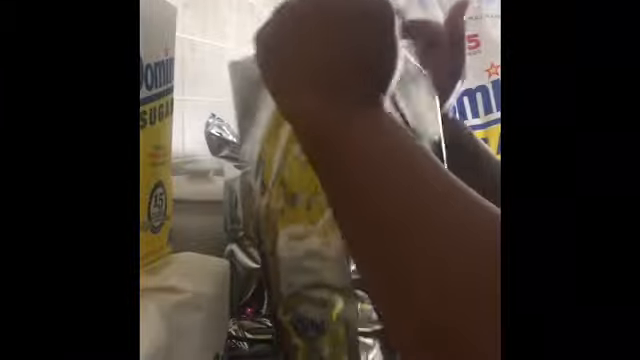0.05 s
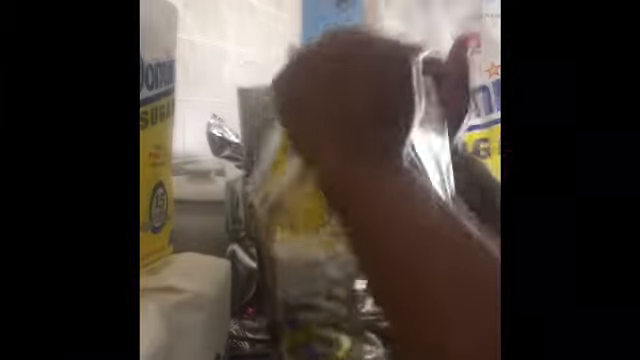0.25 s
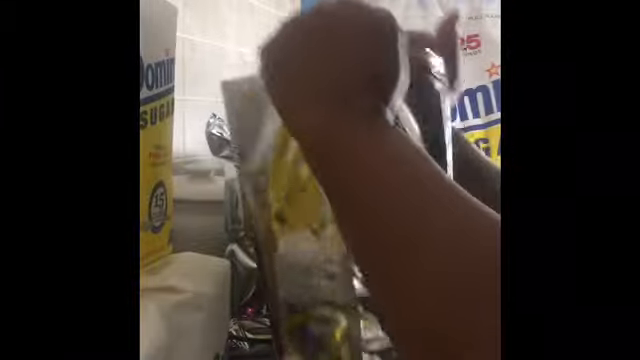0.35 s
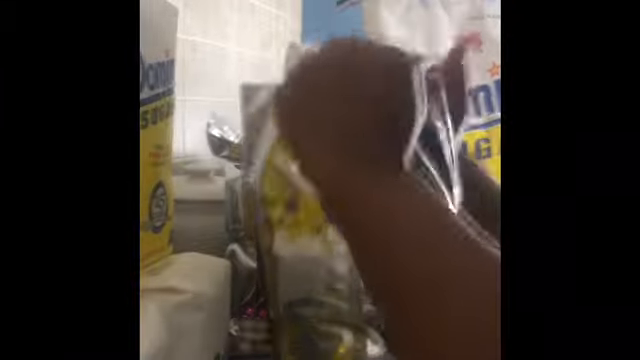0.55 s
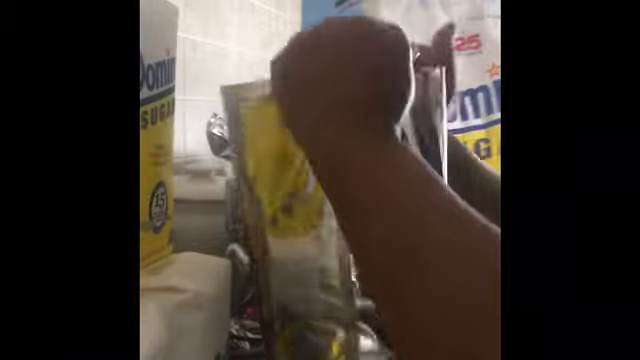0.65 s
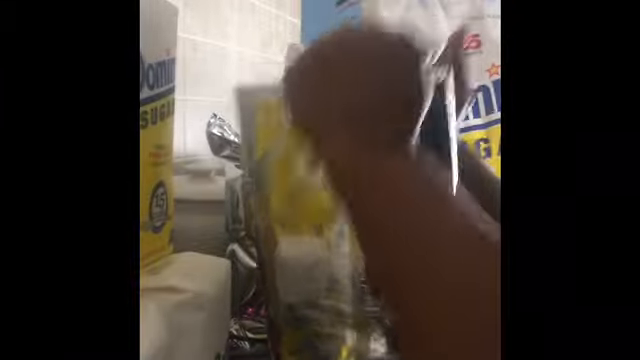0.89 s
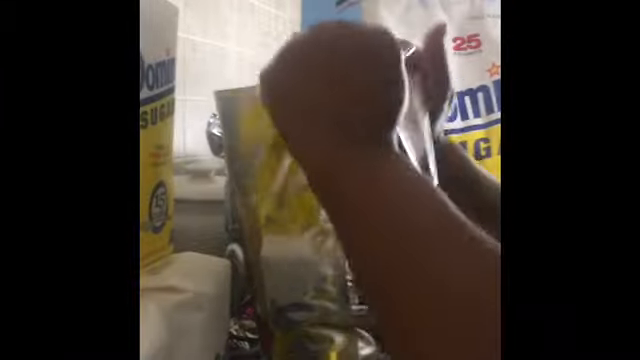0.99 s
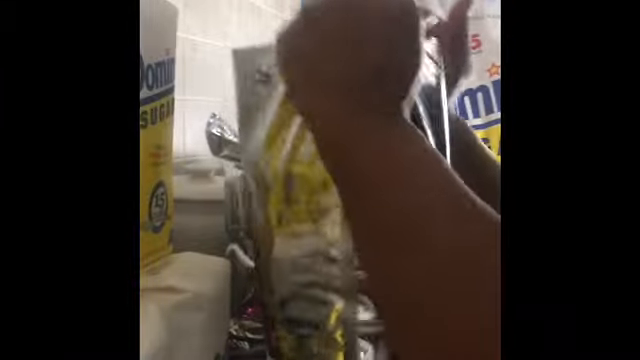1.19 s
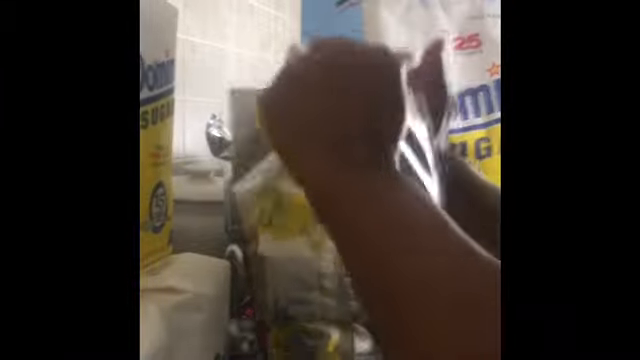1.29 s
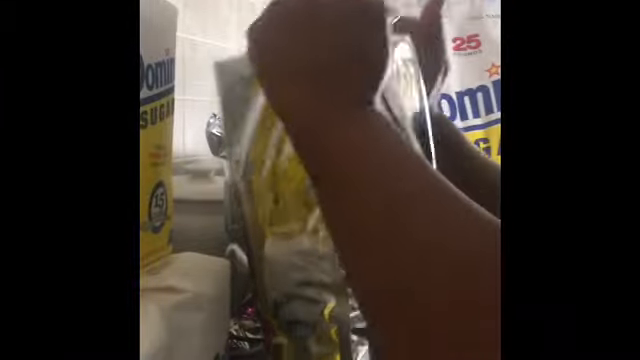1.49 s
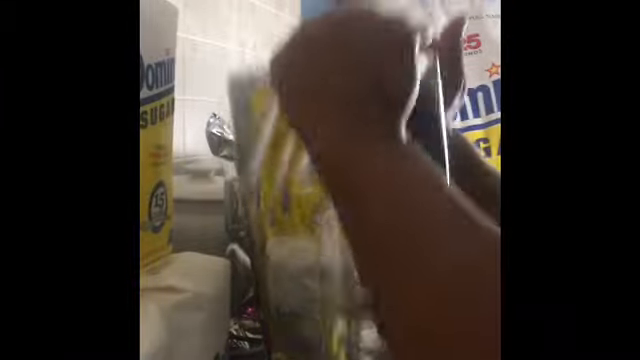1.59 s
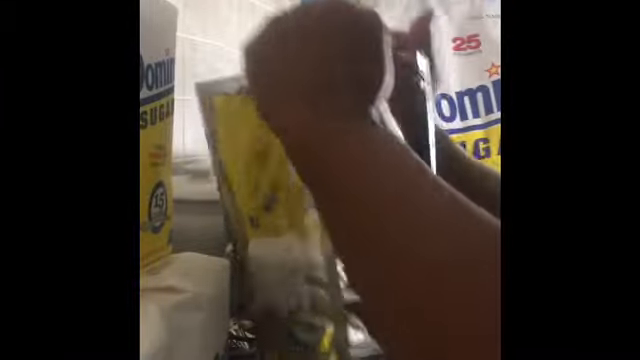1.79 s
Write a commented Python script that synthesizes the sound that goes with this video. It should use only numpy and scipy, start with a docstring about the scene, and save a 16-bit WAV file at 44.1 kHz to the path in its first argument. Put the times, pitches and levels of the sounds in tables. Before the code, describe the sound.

Bag of sugar knocked about on a counter, heard close on a small, bass-thin microphone: crackling foil and one heavy clattering knock, suddenly cut, then four regular lighter taps with dull slumping filling and faint ringing.

```python
"""Kitchen counter: a filled foil bag is knocked about on it. A loud close passage (shuffle, rap, heavy knock,
rattling) is cut off, then come four even, quieter taps. Force bumps ring the counter as dying sines; each tap
also makes a loose part tick twice (short modes with a near reflection), a vessel ring faintly (slow sines) and
the filling slump (noise bands). Foil is coloured noise bursts and grainy rustle; a steady noise floor lies below."""
import sys
import numpy as np
from scipy import signal
from scipy.fft import rfft, irfft
from scipy.io import wavfile

SR = 44100
rng = np.random.default_rng(int(sys.argv[2]) if len(sys.argv) > 2 else 0)


def transcribe(u):
    """Save the signal u as a 16-bit wav file named by the first command-line argument.

    u: samples, shape (n,) or (channels, n), limited to [-1, 1]; the rate is SR.
    q: integer samples, one column per channel.
    """
    v = np.clip(np.atleast_2d(u).T, -1, 1)
    q = np.round(v * 32767).astype(np.int16)
    wavfile.write(sys.argv[1], SR, q)


def attenuation_scalar(level_db):
    """Turn a level in dB into a linear amplitude multiplier (20 dB per decade)."""
    decades = np.asarray(level_db, float) / 20
    return 10 ** decades


N = 81585  # length in samples


def evened(x):
    """Scales a sound to an rms of 1."""
    return x / np.sqrt(np.mean(x ** 2) + 1e-20)


def add(mix, s, sound):
    """Lays a sound into the mix at s seconds, trimmed to fit."""
    part = mix[max(round(s * SR), 0):][:len(sound)]
    part += sound[:len(part)]


def seconds(length_s):
    """Time axis in seconds."""
    return np.arange(0, length_s, 1 / SR)


def coloured(x, points):
    """Shapes a sound by a spectrum of (freq_hz, level_db) points, joined on a log frequency axis."""
    point_hz, level_db = np.transpose(points)
    hz = np.fft.rfftfreq(len(x), 1 / SR)
    gain_db = np.interp(np.log(hz + 1), np.log(point_hz + 1), level_db)
    return irfft(rfft(x) * attenuation_scalar(gain_db), len(x))


def band(x, lo_hz, hi_hz):
    """Band-passes a sound and scales it to an rms of 1."""
    return evened(signal.sosfilt(signal.butter(2, [lo_hz, hi_hz], "band", fs=SR, output="sos"), x))


def rings(modes, length_s):
    """Sum of dying sines, one for each (pitch_hz, level_db, t60_s)."""
    t = seconds(length_s)
    return sum(attenuation_scalar(db - 60 * t / t60) * np.sin(2 * np.pi * hz * t) for hz, db, t60 in modes)


def pushes(rows):
    """Downward force bumps of unit area times level; a longer contact excites less treble."""
    force = np.zeros(N)
    for s, db, contact_ms in rows:
        bump = np.hanning(max(round(contact_ms * SR / 1000), 4))
        add(force, s, -attenuation_scalar(db) * bump / bump.sum())
    return force


def puff(colour, t60_s):
    """A dying burst of coloured noise, 30 ms long, peak 1."""
    t = seconds(.03)
    x = coloured(rng.standard_normal(len(t)), colour) * attenuation_scalar(-60 * t / t60_s)
    return x / abs(x).max()


# Taps of the bag: start_s, strength_db
TAPS = [(0.579, -28.5), (.9397, -28), (1.3062, -28), (1.6606, -29.5)]


def taps():
    """Each tap thuds the counter, slumps the filling, scuffs foil and leaves the vessel ringing."""
    out = thuds(TAPS)
    for k, (s, db) in enumerate(TAPS):
        add(out, s, vessel(k))
        add(out, s - .02, attenuation_scalar(db) * slump())
        add_scuffs(out, s, db)
    add_ticks(out)
    add_settling(out)
    return out


# Contacts of the bag bottom within a tap: offset_s, level_db (relative to the tap), contact_ms
BAG_CONTACTS = [(-.019, -17.5, 2.4), (-.0135, -13, 1.95), (-.0075, -9, 2.1), (-.0026, -1, 2.64),
                (.0078, -7.5, 3.3), (.018, -5, 2.6), (.029, -15.5, 2.6)]
# Later small bounces: start_s, level_db, contact_ms
BOUNCES = [(.626, -44.5, 2.6), (0.646, -45, 2.6), (0.679, -47, 2.6), (0.984, -43, 2.5), (1.034, -48.5, 2.4),
           (1.059, -49.5, 2.4), (1.359, -42, 2.4), (1.398, -43.5, 3.6), (1.43, -50, 4),
           (1.725, -45.5, 2.14), (1.765, -49, 4)]
# The bag springing off the counter once in each tap: start_s, level_db
LIFTS = [(0.594, -30.5), (0.955, -30.5), (1.3198, -30.5), (1.6752, -37.5)]


def thuds(tap_rows):
    """Contacts and bounces push the counter down, lifts pull it the other way, and it rings."""
    contacts = [(s + offset_s, db + level_db, contact_ms)
                for s, db in tap_rows for offset_s, level_db, contact_ms in BAG_CONTACTS]
    force = pushes(contacts + BOUNCES)
    force -= pushes([(s, db, 2.58) for s, db in LIFTS])
    return counter(force, "tap")


# Modes of the counter: pitch_hz, tap_db (where the taps land), knock_db (where the heavy knock lands), t60_s
COUNTER_MODES = [(54, -8.5, -19, .24), (90, -2, -23.5, 0.037), (137, -23, 0, 0.029), (150, -7, -9, 0.079),
                 (212, -6.5, -4, 0.049), (299, 0, -2, 0.037), (369, -2.5, -4, .05), (515, -10.5, -11, .05),
                 (735, -1.5, -10, .03), (1080, -8, -13, .04)]


def counter(force, place):
    """Counter top rung by a force; the place struck sets how strongly each mode answers."""
    modes = [(hz, tap_db if place == "tap" else knock_db, t60)
             for hz, tap_db, knock_db, t60 in COUNTER_MODES]
    return signal.fftconvolve(force, rings(modes, .5))[:N]


# Loose part struck twice in each tap: start_s, level_db (energy), tilt_db_per_octave, notch_hz
TICKS = [(.5791, -11, -2, 5110), (.6021, -14.5, 2, 16500), (.9397, -13, -1, 8200), (.9628, -15, -0.5, 9470),
         (1.3055, -11.5, -1, 4340), (1.3286, -15, 0.5, 12000), (1.6608, -12.5, 0, 12300),
         (1.684, -16, -0.3, 12200)]


def add_ticks(mix):
    """The loose part ticks and rebounds, with opposite polarity."""
    for k, (s, db, tilt_db, notch_hz) in enumerate(TICKS):
        polarity = -1 if k % 2 == 0 else 1
        add(mix, s, polarity * attenuation_scalar(db) * tick(tilt_db, notch_hz))


# Modes of the loose part: pitch_hz, level_db, t60_s
TICK_MODES = [(1100, -14.5, 0.0053), (2057, -12.5, 0.0026), (3330, -3.5, 0.0016), (4540, -0.5, 0.0013),
              (6320, -1.5, 0.0024), (8600, -2.5, 0.00154), (11040, -2.5, 0.0019), (13200, -5.5, 0.0012),
              (14800, -5.5, 0.002)]


def tick(tilt_db, notch_hz):
    """All modes struck at once, a little differently each time; a near reflection thins the notch pitch."""
    t = seconds(.03)
    hit = np.zeros(len(t))
    for k, (hz, db, t60) in enumerate(TICK_MODES):
        level_change, pitch_change = rng.standard_normal(2)
        level_db = db + level_change + tilt_db * np.log2(hz / 6000)
        hit += (-1) ** k * rings([(hz * (1 + 0.033 * pitch_change), level_db, t60)], .03)
    hit *= np.minimum(t / 0.00009, 1)  # rise time in s
    # reflection late by half a period of the notch pitch
    echo = attenuation_scalar(-2.5) * np.exp(-1j * np.pi * np.fft.rfftfreq(len(t), 1 / SR) / notch_hz)
    hit = irfft(rfft(hit) * (1 + echo), len(t))
    return hit / np.linalg.norm(hit) + attenuation_scalar(-32.5) * foil_scuff(0.013)  # energy 1, plus a faint tail


def slump():
    """Filling slumping, relative to the tap: low scrunch, mid wash and a rattle while the bag is down."""
    t = seconds(.5)
    low, mid, loose = rng.standard_normal((3, len(t)))
    rise = np.minimum(t / 0.011, 1)
    scrunch = rise * attenuation_scalar(-15 - 60 * t / 0.35) * band(low, 53, 461)
    wash = rise * attenuation_scalar(-35 - 60 * t / 0.48) * band(mid, 360, 1400)
    down = np.sin(np.pi * np.minimum(t / 0.071, 1)) ** 2  # bag down for 71 ms
    return scrunch + wash + down * attenuation_scalar(-27) * band(loose, 780, 1130)


# Vessel on the counter: pitch_hz, t60_s, then tap_1_db, tap_2_db, tap_3_db, tap_4_db
VESSEL_MODES = [(170, 1.13, -64.5, -65.5, -66, -62.5), (325, 1.24, -70.5, -56, -54, -57.5),
                (511, 0.65, -56, -62, -58, -56.5), (726, 0.54, -68, -69, -60, -64)]


def vessel(k):
    """Vessel set ringing by tap k: long modes that swell in over 37 ms."""
    ring = rings([(hz, levels_db[k], t60) for hz, t60, *levels_db in VESSEL_MODES], 1.2)
    return ring * np.minimum(seconds(1.2)[:len(ring)] / 0.037, 1)


# Soft scuffs of foil within a tap: offset_s, level_db (peak, relative to the tap)
SCUFFS = [(-.015, -20), (-.011, -23), (.004, -25), (0.013, -20.5), (0.014, -29), (.026, -29)]


def add_scuffs(mix, s, tap_db):
    """Foil scuffing softly around a tap, as short noise bursts."""
    for offset_s, level_db in SCUFFS:
        add(mix, s + offset_s, attenuation_scalar(tap_db + level_db) * foil_scuff(0.016))


# Colour of scuffing foil: freq_hz, level_db
SCUFF_COLOUR = [(500, -5), (1200, 7), (3500, 0), (4500, -22), (10000, -20), (16000, -26)]


def foil_scuff(t60_s):
    """One scuff: dying noise strongest around 1 kHz."""
    return puff(SCUFF_COLOUR, t60_s)


# Faint ticks of settling foil: start_s, level_db (peak)
SETTLING = [(.434, -57.5), (0.787, -56), (.985, -47.5), (1.049, -57), (1.143, -59.5), (1.19, -56),
            (1.41, -55.5), (1.513, -56.5), (1.728, -46), (1.764, -56)]


def add_settling(mix):
    """Foil settling in faint crackles before, during and between the taps."""
    for s, db in SETTLING:
        add(mix, s, attenuation_scalar(db) * foil_crack(0.016))


# Colour of crackling foil: freq_hz, level_db
CRACK_COLOUR = [(500, 5.5), (1500, -3), (3500, -5.5), (6000, -10), (12000, -17.5), (16000, -15)]


def foil_crack(t60_s):
    """One crack of foil: dying broadband noise, falling towards the treble."""
    return puff(CRACK_COLOUR, t60_s)


# Heavy knock contacts: start_s, level_db, contact_ms
KNOCK_CONTACTS = [(.063, -28, 3.2), (.199, -19, 1.7), (.2053, -4.5, 1.7), (.2115, -19, 3.4), (.228, -12, 5),
                  (.243, -22.5, 4), (.263, -20, 3.4), (.283, -32.5, 1.9), (.3, -24.5, 4.4),
                  (.325, -33, 2.6)]


def knock():
    """Heavy contacts ring the counter, amid a squeak, raps of loose things and snaps of foil."""
    out = counter(pushes(KNOCK_CONTACTS), "knock")
    add_squeak(out)
    add_raps(out)
    add_snaps(out)
    return out


# Loose things rapping: start_s, level_db, pitch_hz
RAPS = [(.001, -33.5, 980), (.02, -29.5, 584), (.028, -34, 1200), (.062, -16, 1250), (0.074, -24.5, 1100),
        (0.086, -29, 1260), (.098, -30.5, 1030), (0.1947, -23.5, 900), (.2, -19.5, 600), (.208, -14, 760),
        (.217, -19.5, 900), (.226, -26.5, 970), (.232, -19.5, 1000), (0.243, -21.5, 850), (0.25, -20, 1058),
        (.278, -23.5, 1260), (0.2902, -17, 1100), (.299, -22, 1500), (0.308, -23.5, 1020),
        (.325, -21.5, 900), (0.337, -23.5, 1234)]
# Body that every rap sets ringing: pitch_hz, level_db, t60_s
RAP_BODY = [(317, -7, 0.045), (629, -10.5, .03), (1043, -7, .04), (1210, -11.5, 0.038),
            (1917, -18.5, 0.017), (2470, -17, 0.015)]


def add_raps(mix):
    """Each rap rings at its own pitch and a random overtone, over a shared body, with a crack of foil."""
    body = rings(RAP_BODY, .1)
    for s, db, hz in RAPS:
        overtone_hz = hz * rng.uniform(1.1, 2.5)
        own = rings([(hz, 0, 0.021), (overtone_hz, -8, .012)], .1)
        rise = np.minimum(np.arange(len(own)) / SR / .0008, 1)
        add(mix, s, attenuation_scalar(db) * rise * (own + rng.choice([-1, 1]) * body))
        add(mix, s, attenuation_scalar(db - 10.5) * foil_crack(0.016))


# Foil snapping in the loud passage: start_s, level_db (peak)
SNAPS = [(.0275, -31), (.075, -27), (.2165, -16), (.2905, -23.5), (.2985, -25.5)]


def add_snaps(mix):
    """Foil snapping: cracks that die half as fast as the settling ones."""
    for s, db in SNAPS:
        add(mix, s, attenuation_scalar(db) * foil_crack(0.032))


# One squeak: start_s, level_db, pitch_hz, length_s
SQUEAK = (.231, -24, 3390, .007)


def add_squeak(mix):
    """A very short swelling and fading sine."""
    s, db, hz, length_s = SQUEAK
    t = seconds(length_s)
    add(mix, s, attenuation_scalar(db) * np.hanning(len(t)) * np.sin(2 * np.pi * hz * t))


# Foil and sugar rustling: start_s, mid_db, treble_db, bass_db (last two relative to mid_db; all before band trims)
RUSTLE = [(0.0, -42, -4, 5.5), (0.022, -51.5, -0.5, 10), (0.028, -41.5, -8, 2.5), (0.059, -53.5, 1, 13),
          (0.063, -41, -3, 13), (0.11, -49.5, -1.5, 9), (0.178, -62.5, -3, 15.5), (0.194, -41.5, -10.5, 2),
          (0.206, -37, -14, 17), (0.22, -28.5, -3.5, 5), (0.272, -40, -5, 9.5), (0.298, -39, -6, 12),
          (0.328, -39, -1, 12), (0.345, -44.5, -0.5, 9.5)]
# Counter shaking under the hands: start_s, level_db
SHAKING = [(0, -33.5), (.06, -47), (.1, -44), (.15, -48.5), (.185, -49.5), (.2, -35), (.225, -29),
           (.26, -33), (.3, -32), (.345, -41.5)]


def rustle():
    """Grainy crackle in three bands, swelled by random grains, and a low shaking."""
    t = np.arange(N) / SR
    s, mid_db, treble_db, bass_db = np.transpose(RUSTLE)
    bursts = rng.random(N) < 6000 / SR  # 6000 grains per second on average
    swell = .5 + signal.lfilter([1], [1, -.97], bursts)  # each grain dies away
    mid, treble, bass, shake = rng.standard_normal((4, N)) * swell

    def level(db):
        return attenuation_scalar(np.interp(t, s, db))

    out = level(mid_db - 6) * band(mid, 1500, 4400)
    out += level(mid_db + treble_db - 3.5) * band(treble, 5600, 14000)
    out += level(mid_db + bass_db - 5.5) * band(bass, 130, 1500)
    return out + attenuation_scalar(np.interp(t, *np.transpose(SHAKING))) * band(shake, 38, 70)


# Colour of the noise floor: freq_hz, level_db
FLOOR_COLOUR = [(15, -34.5), (25, -5), (202, 0.5), (470, -7.5), (584, -9), (787, -10.5), (1220, -10.5),
                (1550, -16.5), (12600, -26.5), (15200, -19.5), (16500, -42.5)]


def floor():
    """Steady coloured noise at -68.5 dB rms."""
    return attenuation_scalar(-68.5) * evened(coloured(rng.standard_normal(N), FLOOR_COLOUR))


def scene():
    """The loud passage, cut off, then the taps, over the floor."""
    cut = np.clip((np.arange(N) / SR - 0.3442) / 0.025, 0, 1)  # start and length of the cut in s
    loud_passage = (knock() + rustle()) * attenuation_scalar(-45 * cut) * (cut < 1)  # falls 45 dB, then silent
    return (taps() + loud_passage + floor())[None]


def top_cut(x):
    """Nothing passes above the cut-off."""
    return signal.sosfilt(signal.butter(12, 16840, fs=SR, output="sos"), x)


def record(dry):
    """Small microphone with no deep bass, a treble limit and clipping just under full scale."""
    thin = signal.sosfilt(signal.butter(3, 42.8, "high", fs=SR, output="sos"), dry)
    treble_limit = signal.firwin(63, 15900, window=("kaiser", 6), fs=SR)
    limited = signal.oaconvolve(thin, treble_limit[None], "same")
    return top_cut(np.clip(limited, -.99, .99))


dry = scene()
out = record(dry)
transcribe(out)
```